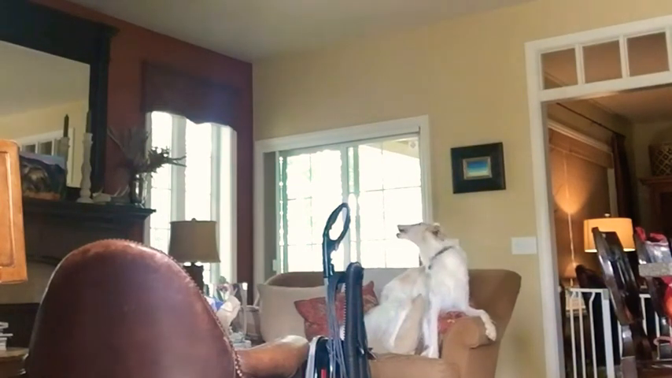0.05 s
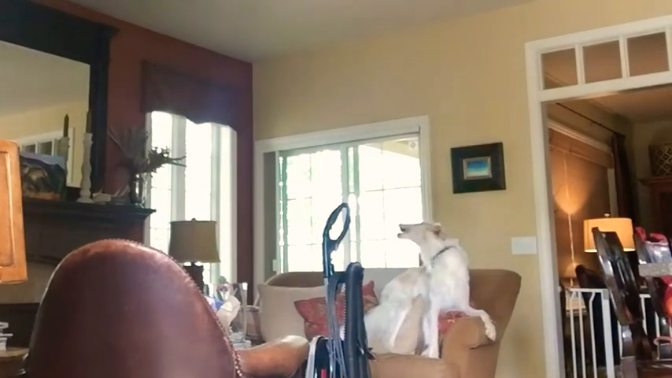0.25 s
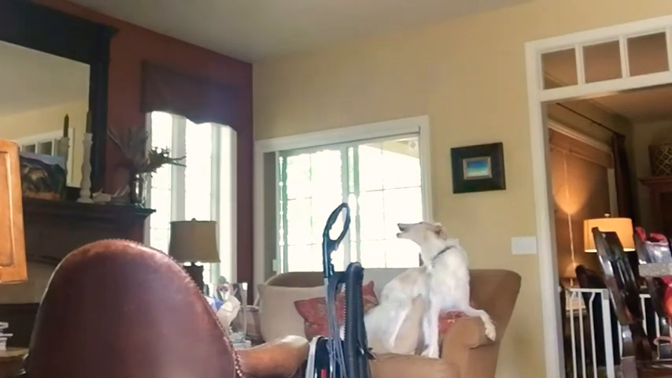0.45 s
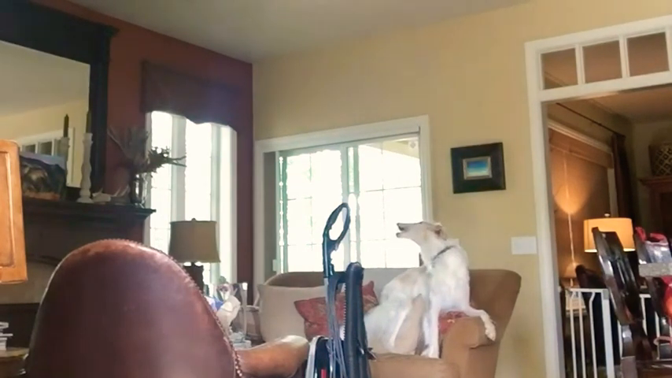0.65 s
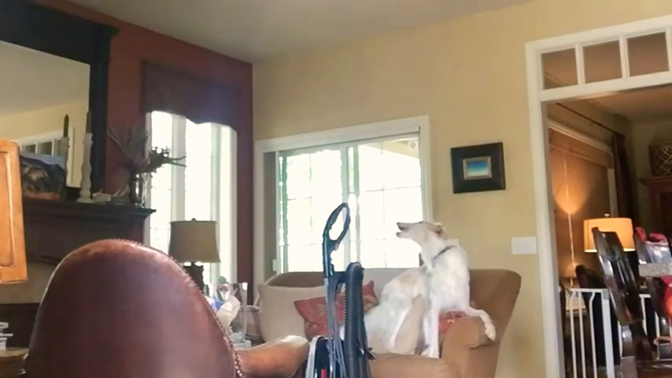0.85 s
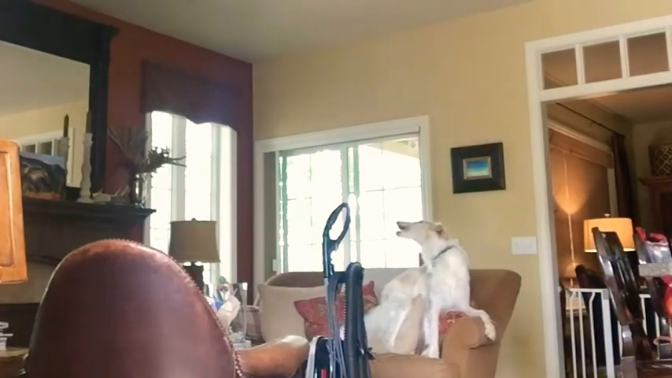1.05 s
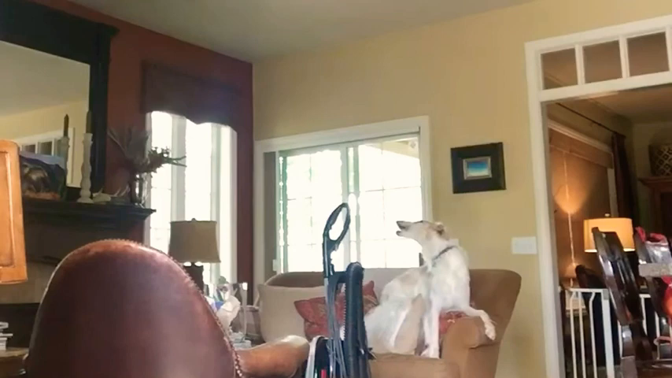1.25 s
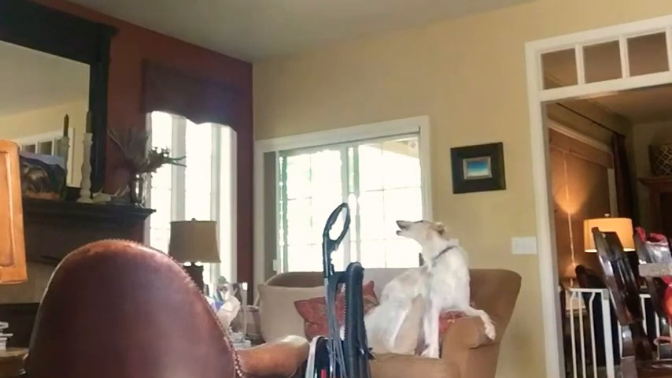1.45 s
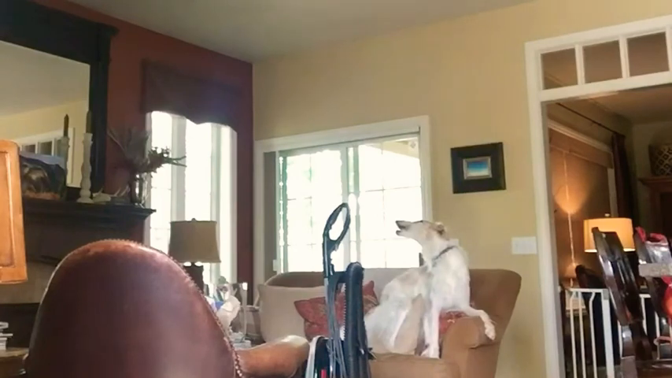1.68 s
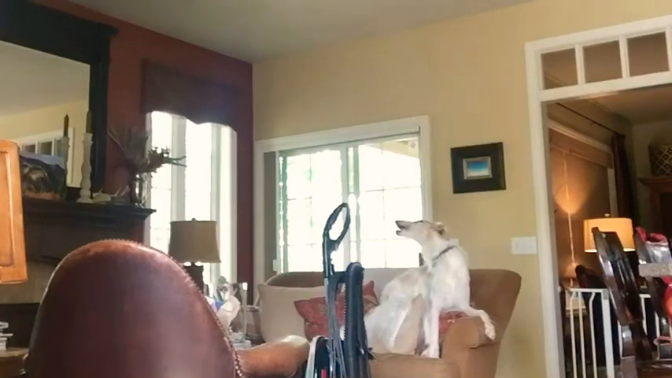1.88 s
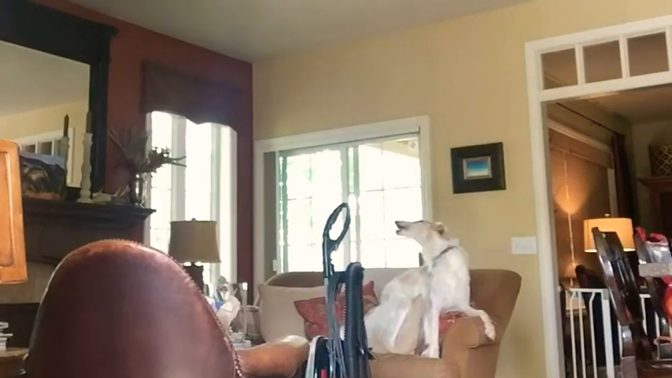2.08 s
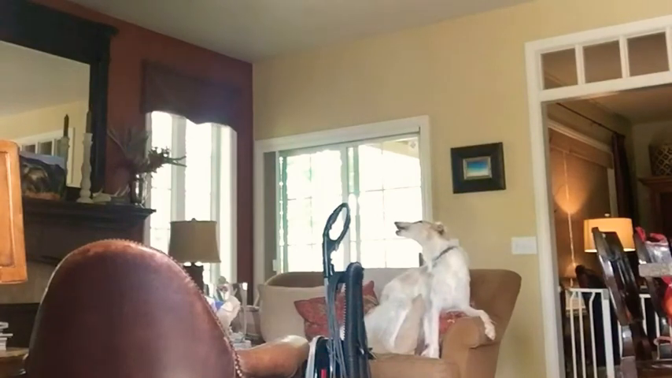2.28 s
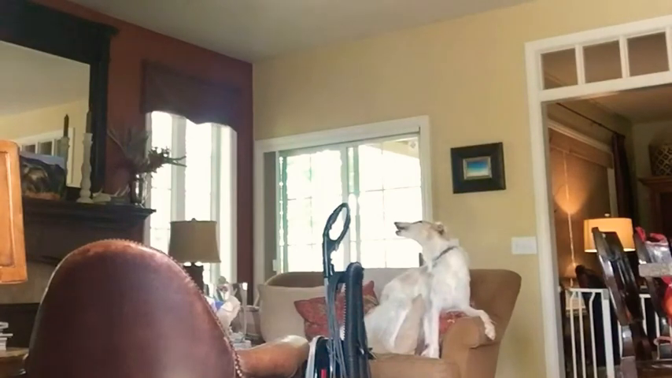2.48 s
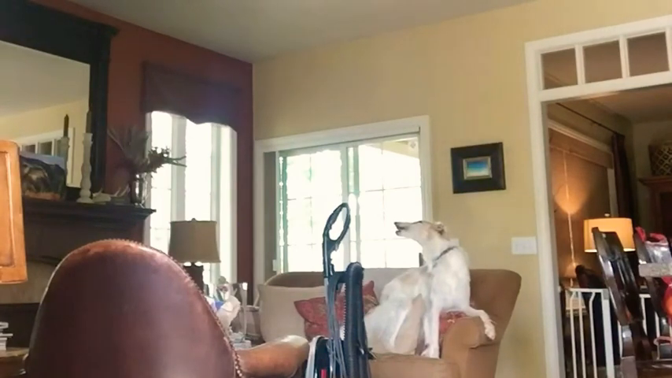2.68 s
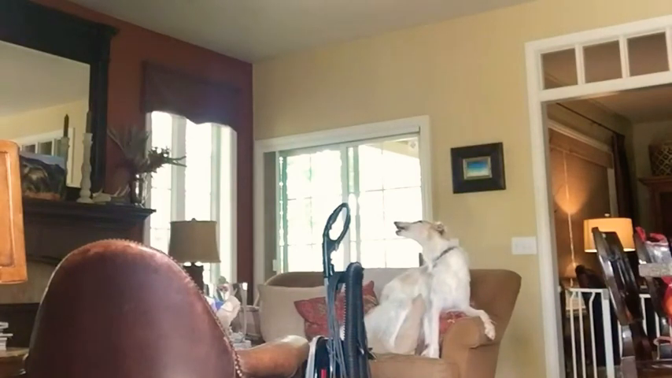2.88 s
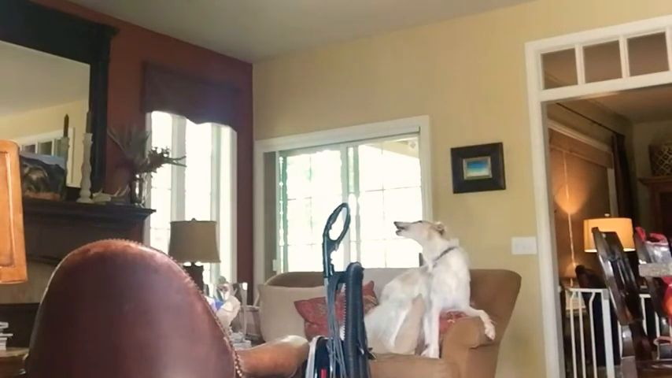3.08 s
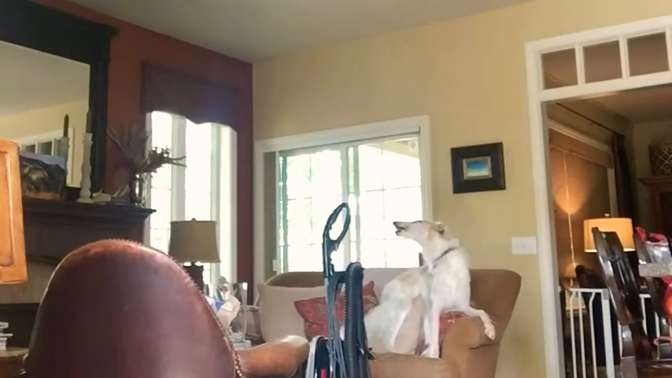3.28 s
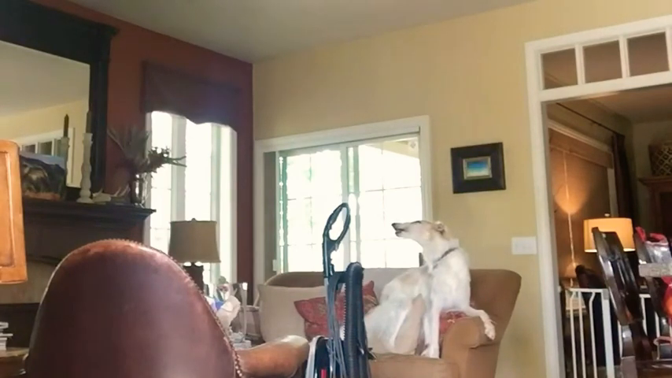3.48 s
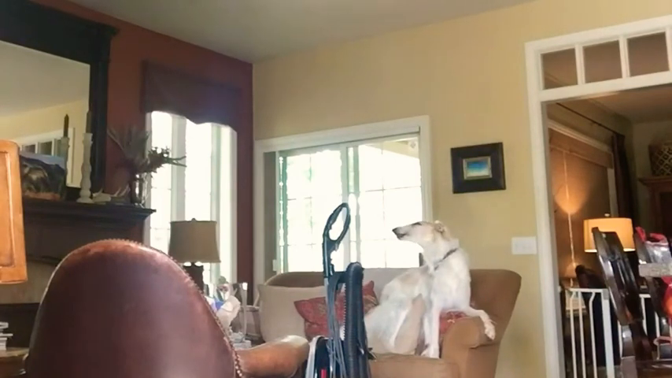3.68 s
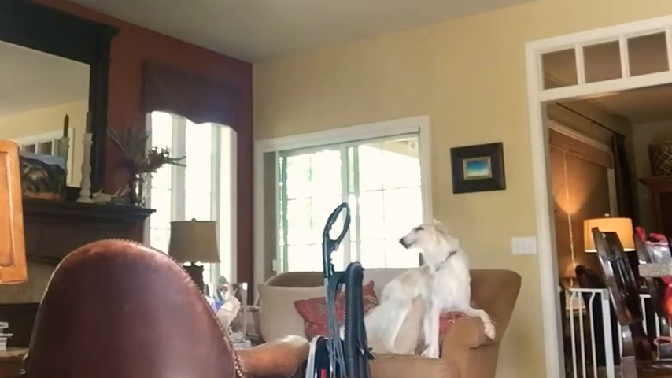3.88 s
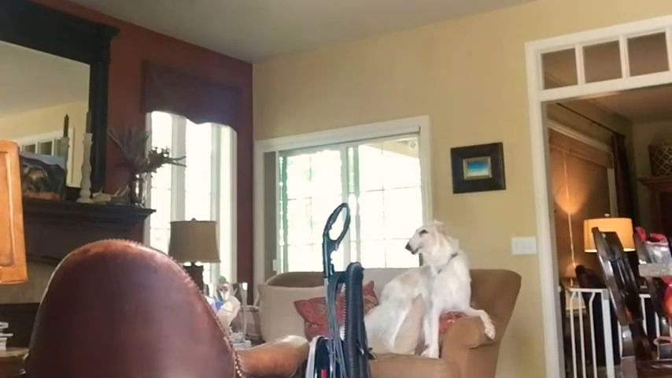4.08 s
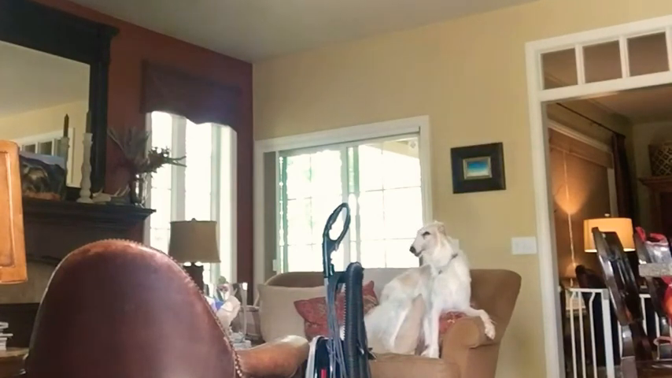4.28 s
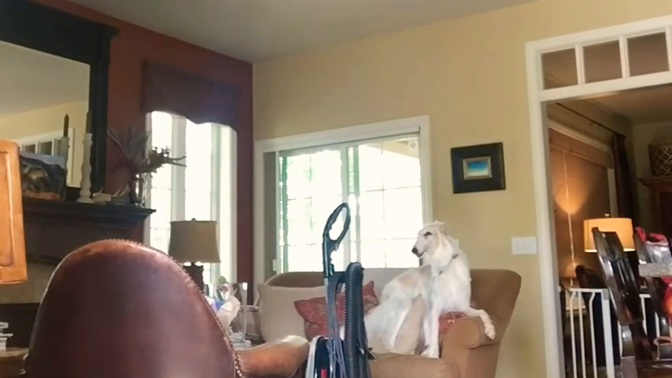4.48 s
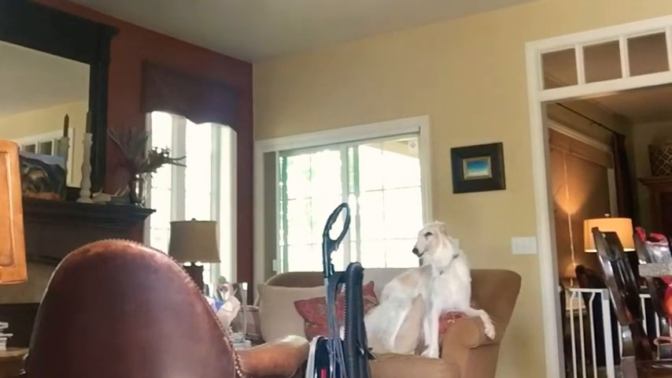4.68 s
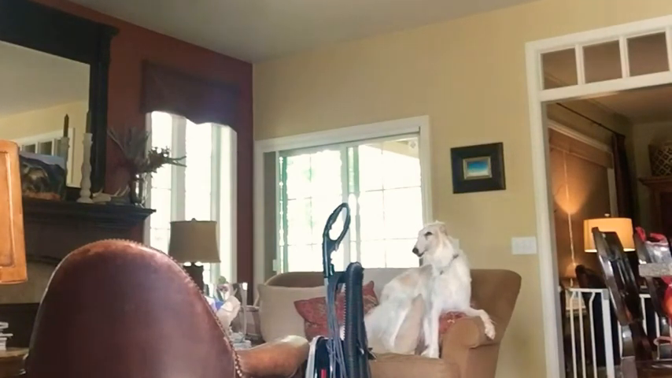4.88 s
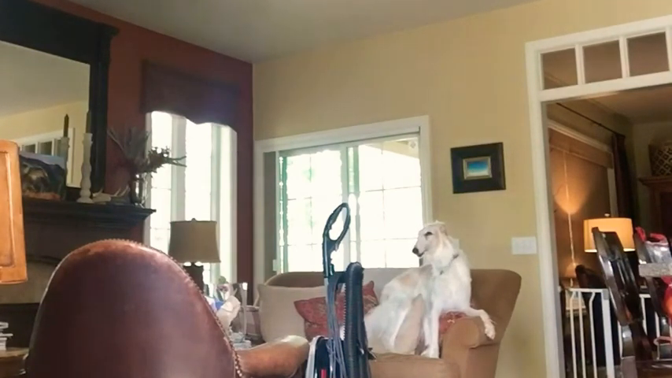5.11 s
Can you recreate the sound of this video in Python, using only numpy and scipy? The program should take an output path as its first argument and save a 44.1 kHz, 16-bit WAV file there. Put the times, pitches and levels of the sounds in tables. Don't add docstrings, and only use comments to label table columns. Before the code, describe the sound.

A dog howls once, already sounding at the start, at some distance in a living room. The clear, hooting note slides down for almost four seconds with a thin high whistle and breath around it. A rough flutter splits it after one second; later it drops lower, squeaks, cracks and ends in a tiny grunt. A small camera microphone catches the short room echo and low house hum.

```python
import sys
import numpy as np
from scipy import signal
from scipy.fft import rfft, irfft
from scipy.io import wavfile
from scipy.ndimage import uniform_filter1d

SR = 44100
rng = np.random.default_rng(int(sys.argv[2]) if len(sys.argv) > 2 else 0)


def master(y):
    cut = np.clip(np.atleast_2d(y).T, -1, 1)
    pcm = np.round(cut * 32767)
    wavfile.write(sys.argv[1], SR, pcm.astype(np.int16))


def gain_from_db(level_db):
    decades = np.asarray(level_db, float) / 20
    return 10 ** decades


N = 227065
T = np.arange(N) / SR
SLOW = slice(None, None, 64)


def evened(x):
    return x / np.sqrt(np.mean(x ** 2) + 1e-20)


def curves(rows):
    s, *columns = np.transpose(rows)
    return [np.interp(T, s, c) for c in columns]


def read(points, hz):
    f, value = np.transpose(points)
    return np.interp(np.log(hz + 1), np.log(f + 1), value)


def sounding(start_s, end_s, fade_s):
    return np.clip(np.minimum(T - start_s, end_s - T) / fade_s + 1, 0, 1)


def after(s, glide_s):
    return 0.5 + 0.5 * np.tanh((T - s) / glide_s)


def dips(rows):
    return sum(db * np.exp(-((T - s) / length) ** 2) for s, length, db in rows)


def wobble(hz):
    return evened(signal.lfilter(*signal.butter(2, hz, fs=SR), rng.standard_normal(N)))


def phase(hz):
    return 2 * np.pi * np.cumsum(hz) / SR


def coloured(gain):
    return evened(irfft(rfft(rng.standard_normal(N)) * gain(np.fft.rfftfreq(N, 1 / SR)), N))


# frequency in Hz, density in dB per Hz.
HUM = [(15, -51.5), (25, -16), (116, -3.5), (148, -10.5), (183, 0), (215, -21.5), (289, -15), (359, -27),
       (919, -32.5), (2360, -34.5), (2770, -38), (3530, -36.5), (7100, -40.5), (9300, -39), (15500, -40.5)]
# frequency in Hz, level in dB.
WHINE = [(9001, -96.5)]


def house():
    hum_db = -66
    hum = gain_from_db(hum_db) * coloured(lambda hz: gain_from_db(read(HUM, hz)))
    whine = sum(np.sqrt(2) * gain_from_db(db) * np.sin(2 * np.pi * hz * T) for hz, db in WHINE)
    return hum + whine


# frequency in Hz, t60 in seconds.
ROOM = [(300, 0.47), (1000, 0.47), (4000, 0.54), (12000, 0.042)]


def room(x):
    taps = np.zeros(SR)
    at = np.arange(300, SR - 20, 20)
    taps[at + rng.integers(0, 20, len(at))] = rng.choice([-1., 1.], len(at))
    hz, t, z = signal.stft(taps, SR, nperseg=256)
    decay = gain_from_db(-60 * t / read(ROOM, hz)[:, None])
    tail = signal.istft(z * decay, SR, nperseg=256)[1]
    return signal.fftconvolve(x, tail / np.linalg.norm(tail))[:N]


# frequency in Hz, signed gain, t60 in seconds.
WAVES = [(363.0, -0.56, 0.34), (471.2, 0.36, 0.42), (488.8, 0.18, 0.23), (513.1, 0.87, 0.43),
         (514.3, -1.09, 0.27), (515.9, 1.02, 0.41), (545.7, -0.27, 0.3), (558.3, -0.15, 0.23),
         (581.9, -0.2, 0.27), (619.3, 0.27, 0.27), (644.1, 0.3, 0.59), (681.5, -1.91, 0.37),
         (711.0, -1.25, 0.46), (749.5, 2.0, 0.09),
         (780, 2.5, 0.33), (781.5, -4.5, 0.16), (939, -0.97, 0.14), (992.2, -1.5, 0.23),
              (1122.3, 3, 0.2), (1171, -3, 0.62), (1144, -1, 0.3), (1192.4, -5, 0.14), (1233.1, -12, 0.39),
              (1265.3, 11, 0.2), (1312.6, 11, 0.12), (1312.5, -8.5, 0.24), (1342.2, 3, 0.18),
              (1390.4, 4.5, 0.093),
         (735.5, .85, .45), (738.8, .85, .45)]


def standing(x):
    direct_gain = 0.27
    out = direct_gain * x
    for hz, gain, t60 in WAVES:
        r = np.exp(-np.log(1000) / t60 / SR)
        pole = r * np.exp(2j * np.pi * hz / SR)
        out = out + signal.lfilter([gain * (1 - r)], [1, -pole], x)
    return out.real


# frequency in Hz, width in Hz, level in dB.
THROAT = [(524.5, 80, -1), (825, 240, 4.5), (1300, 130, 18.5), (1854, 190, -7), (2279, 92, -8),
          (2784, 142, 3.5), (3188, 110, -6.5), (3872, 190, -11.5), (4670, 500, -2.5), (5260, 260, 7),
          (5750, 90, 3), (6467, 85, -2), (7077, 217, -4.5), (8000, 53, -16), (8620, 350, -17),
          (9860, 140, -14.5), (10630, 420, -13.5), (11620, 368, -9), (13400, 840, -4), (14260, 500, -23),
          (15500, 710, -4.5)]


def throat(hz):
    return np.sqrt(sum(gain_from_db(db) ** 2 / (1 + (2 * (hz - f) / width) ** 2) ** 2 for f, width, db in THROAT))


END_S = 3.87
SPLIT_S = 1.01
SHUT = 1 - after(0.2, 0.07)
CHEST = after(1.925, 0.06)
SPLITTING = after(SPLIT_S, 0.05) * (1 - CHEST)

# time in seconds, whistle pitch in Hz, flow in dB.
AIRFLOW = [(0, 3181, 3), (.28, 3246, -2), (.85, 3219, 1), (1.3, 3244, -5), (1.6, 3238, -4.5),
           (1.9, 3239, -1.5), (2.3, 3263, -8.5), (2.95, 3236, -4), (3.2, 3258, -1.5), (3.58, 3257, -7.5),
           (3.77, 3360, -37)]


def flow_driven(full_flow_db, share, chest_db):
    _, flow_db = curves(AIRFLOW)
    return full_flow_db + share * flow_db + chest_db * CHEST


# frequency in Hz, level in dB.
AIR = [(350, -21), (600, 3.5), (1300, -8.5), (3000, 1), (5200, -8), (8000, 22.5), (15000, 4)]


def breath():
    frames, hz = N // 256 + 5, np.fft.rfftfreq(1024, 1 / SR)
    a, b, patches = rng.standard_normal((frames, 513, 3)).T
    patches = uniform_filter1d(patches, size=6, axis=0)
    patches = evened(uniform_filter1d(patches, size=60, axis=1))
    t = np.arange(frames) * 256 / SR
    mouth = 1 + 0.032 * np.exp(-t / 0.67) - 0.02004 * (t / END_S) ** 2
    teeth = gain_from_db(-34) * (hz[:, None] > 8250)
    gain = throat(hz[:, None] / mouth) + teeth
    z = (a + 1j * b) * gain * gain_from_db(read(AIR, hz)[:, None] + 2.5 * patches)
    return evened(signal.istft(z, nperseg=1024, noverlap=768)[1][:N])


def puffed_breath(fold):
    level_db = flow_driven(-58, 0.27, -5) - 8 * after(3.72, 0.03) + 2.0
    puffs = 1 + 0.15 * np.cos(fold)
    return gain_from_db(level_db) * puffs * breath() * sounding(-1, 3.92, 0.046)


# time in seconds, pitch in Hz, level in dB.
GRUNT = [
    (3.86, 332, -110),
    (3.89, 303, -54),
    (3.94, 221.2, -54.5),
    (4.0, 180, -110),
]


def grunt():
    hz, db = curves(GRUNT)
    return gain_from_db(db) * np.cos(phase(hz * (1 + 0.3 * wobble(hz=42.8))))


# time in seconds, length in seconds, gain in dB.
SQUEAKS = [
    (3.13, .03, 10),
    (3.21, .035, 10),
]


def second_whistle(fold):
    end_s, fade_db_per_s = 3.05, 30
    level_db = flow_driven(-57.5, 0.6, -4) - 15.5 * SHUT + dips(SQUEAKS) + 2.1 * wobble(hz=2.64)
    level_db = level_db - fade_db_per_s * np.maximum(T - end_s, 0)
    hz = 5168 + 158.5 * np.exp(-T / 1)
    chop = 1 + 0.8 * np.cos(fold) + 0.081 * np.cos(2 * fold)
    return gain_from_db(level_db) * chop * np.cos(phase(hz * (1 + 0.0044 * wobble(hz=70))))


def family(lines, level_db, fold, whistle):
    (fold_hz, fold_turn), (whistle_hz, whistle_turn) = fold, whistle
    gains = np.array([gain_from_db(db) * throat(abs(m * whistle_hz[SLOW] + n * fold_hz[SLOW])) for m, n, db in lines])
    fades = uniform_filter1d(rng.standard_normal(gains.shape), size=50, axis=1)
    gains *= gain_from_db(4.76 * evened(fades))
    gains /= np.sqrt((gains ** 2).sum(0) / 2)
    out = np.zeros(N)
    for g, (m, n, _) in zip(gains, lines):
        start = 2 * np.pi * rng.random()
        out += np.interp(T, T[SLOW], g) * np.cos(m * whistle_turn + n * fold_turn + start)
    return gain_from_db(level_db) * out


def fold_overtones(pair):
    level_db = -54.5 - 8 * SHUT + 2 * CHEST - 3.5 * SPLITTING - 14 * after(3.74, 0.023)
    tilt_db = -4.0 + 3.7 * after(3.75, 0.03)[SLOW]
    return family([(0, n, tilt_db * (n - 3)) for n in range(3, 10)], level_db, *pair)


# order, level in dB, loss in dB per fold order away from the peak.
WHISTLE_ORDERS = [(1, 1.5, 4.5), (2, 0.5, 6), (3, -10, 3), (4, -13.5, 5.5)]


def whistle_mix(pair):
    whistle_db = flow_driven(-54, 0.99, 3.94) + 1.5 * wobble(hz=21)
    overtone_db = flow_driven(-47, 1.4, -18.5) + 1.5 * wobble(hz=19)
    open_lean, shut_lean, late_lean = 0.92, -0.572, 0.17
    lean = open_lean + (shut_lean - open_lean) * SHUT + (late_lean - open_lean) * after(SPLIT_S, 0.05)
    steeper = 1 + 1.6 * (1 - CHEST[SLOW])
    flanked = []
    for m, db, loss in WHISTLE_ORDERS:
        peak = lean[SLOW] if m > 1 else 0.7
        flanked.append([(m, n, db - loss * steeper * abs(n + peak)) for n in range(-5, 3)])
    return family(flanked[0], whistle_db, *pair) + family(sum(flanked[1:], []), overtone_db, *pair)


# time in seconds, length in seconds, depth in dB.
SPLIT_LULL = [
    (1.29, 0.046, -8.5),
]
# fold order, flutter order, level in dB added to the flutter's running level.
SPLITS = [(1, -1, 4), (1, 1, 7), (2, -1, -5.5), (2, 1, -26.5), (3, -1, -29.5), (1, 2, -17.5), (2, 2, -42.5)]


def flutter(fold_hz, fold):
    since_s = T - SPLIT_S
    split_hz = 478 - 38 * since_s
    turn = phase(fold_hz - split_hz + 3.0 * wobble(hz=25))
    burst_db = 4.5 * np.exp(-((since_s - 0.08) / 0.1) ** 2)
    level_db = -45.5 - 15 * since_s + burst_db + dips(SPLIT_LULL) + 4.0 * wobble(hz=6.9)
    split = gain_from_db(level_db) * sounding(SPLIT_S, 9, 0.03) * (1 - after(1.74, 0.06))
    tones = sum(gain_from_db(db) * np.cos(n * fold + k * turn) for n, k, db in SPLITS)
    return np.sqrt(2) * split * tones, split * np.cos(turn)


# time in seconds, length in seconds, change in
# dB.
FUNDAMENTAL_DIPS = [(.16, 0.0084, -6.5), (.5, 0.033, 0.5), (.813, 0.015, -11.5), (.878, .012, -11.5),
                    (.978, .012, -7.5), (1.325, 0.038, -2.5), (1.921, 0.0063, -8), (2.434, 0.02, -5.5),
                    (2.53, 0.075, -1.5), (3.158, 0.01, -22), (3.402, 0.016, -15.5), (3.532, .022, -12),
                    (3.655, .012, -7.5)]
# time in seconds, pitch in Hz, effort in dB.
HOWL = [(0.0, 812, -20), (0.029, 782, -26.4), (0.14, 711, -30), (0.283, 678.7, -25.0), (0.648, 669.1, -22),
        (0.952, 639.7, -24.2), (1.021, 610.6, -21), (1.218, 614.3, -19), (1.619, 571.1, -20.5),
        (1.905, 529.2, -20), (1.994, 489.5, -23.5), (2.269, 470.2, -24.5), (2.42, 481.7, -24),
        (2.854, 483.2, -26), (3.209, 519.2, -26.5), (3.62, 460.1, -25.5), (3.782, 360.2, -25.5),
        (3.87, 380.8, -27.5)]


def folds(fold, voiced):
    _, effort_db = curves(HOWL)
    octave_db, onset_s = -21.5, 0.0047
    fundamental = gain_from_db(dips(FUNDAMENTAL_DIPS)) * np.exp(1j * fold)
    octave = gain_from_db(octave_db) * (1 + (0.034 + 0.27 * CHEST) * wobble(hz=33.7)) * np.exp(2j * fold)
    note = standing(gain_from_db(effort_db) * voiced * np.minimum(T / onset_s, 1) * (fundamental + octave))
    shimmer = 1 + 0.019 * wobble(hz=144.5) + 0.11 * CHEST * wobble(hz=30.2)
    return np.sqrt(2) * note * shimmer


def dog():
    fold_hz, _ = curves(HOWL)
    whistle_hz, _ = curves(AIRFLOW)
    fold = phase(fold_hz * (1 + 0.0037 * wobble(hz=55.4) + 0.0015 * wobble(hz=9)))
    whistle = phase(whistle_hz * (1 + 0.0009 * wobble(hz=46.6)))
    pair = (fold_hz, fold), (whistle_hz, whistle)
    voiced = sounding(-1, END_S, 0.012)
    sides, shake = flutter(fold_hz, fold)
    cracked = after(3.49, 0.067)
    rough = 0.1 + 0.077 * SPLITTING - 0.04 * CHEST + 0.13 * cracked
    tones = fold_overtones(pair) + whistle_mix(pair) + second_whistle(fold)
    tones *= 1 + 30 * shake + rough * wobble(hz=124)
    voice = sides + tones * voiced + puffed_breath(fold) + grunt()
    return folds(fold, voiced), voice


def scene():
    note, voice = dog()
    echo = room(gain_from_db(-14) * note + gain_from_db(-8) * voice)
    return (note + voice + echo + house())[None]


# frequency in Hz, level in dB.
MASK = [(1300, -60), (1700, -16), (4000, -11), (7000, -9), (9000, -6), (15000, -5.5)]


def masked(x):
    hz, t, z = signal.stft(x, SR, nperseg=2048)
    power = uniform_filter1d(abs(z) ** 2, size=3, axis=-1)
    band = uniform_filter1d(power, size=7, axis=-2)
    around = uniform_filter1d(np.sqrt(power), size=70, axis=-2) ** 2
    kept = band > around * gain_from_db(read(MASK, hz))[:, None] ** 2
    return signal.istft(z * kept, SR, nperseg=2048)[1][..., :N]


def low_pass(x):
    return signal.sosfilt(signal.butter(12, 15650, fs=SR, output="sos"), x)


def record(dry):
    mix = masked(dry)
    return low_pass(mix)


dry = scene()
out = record(dry)
master(out)
```